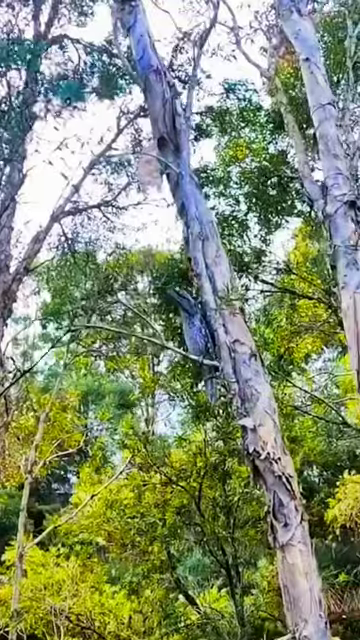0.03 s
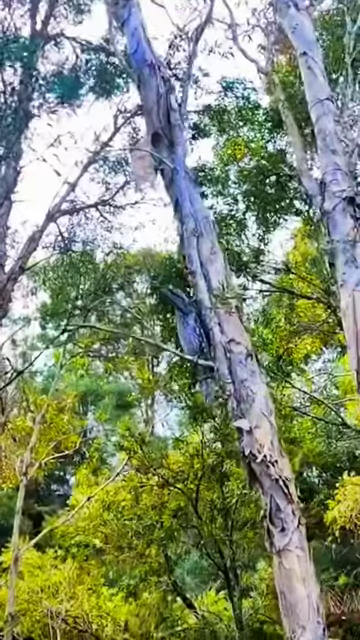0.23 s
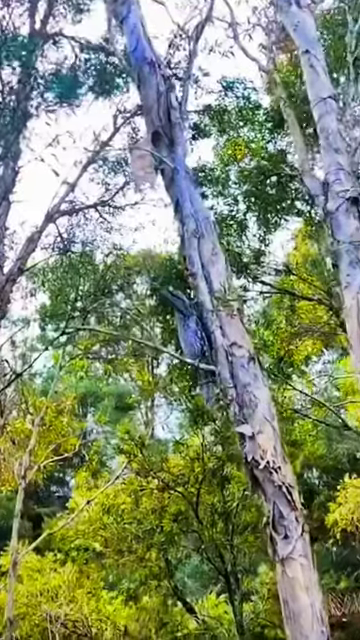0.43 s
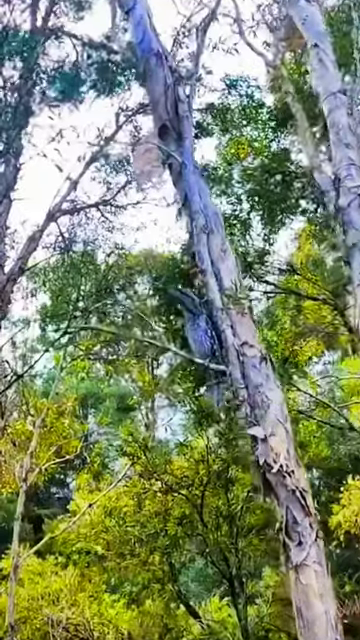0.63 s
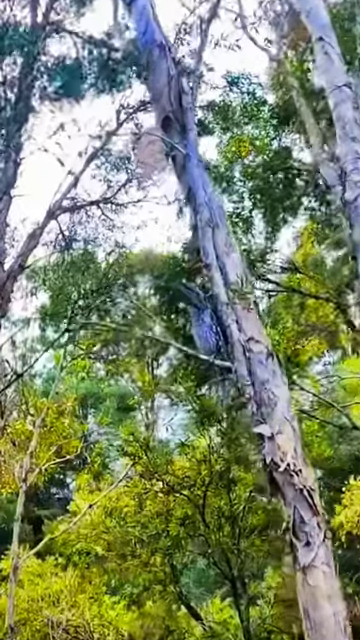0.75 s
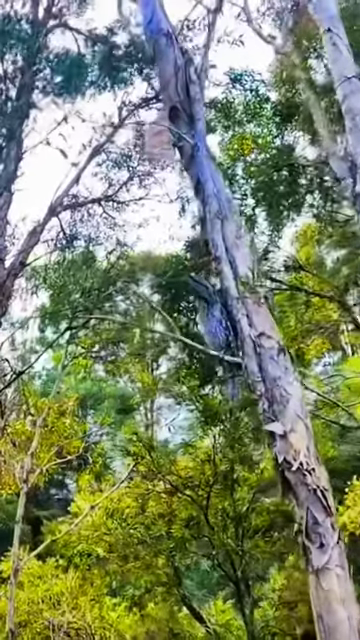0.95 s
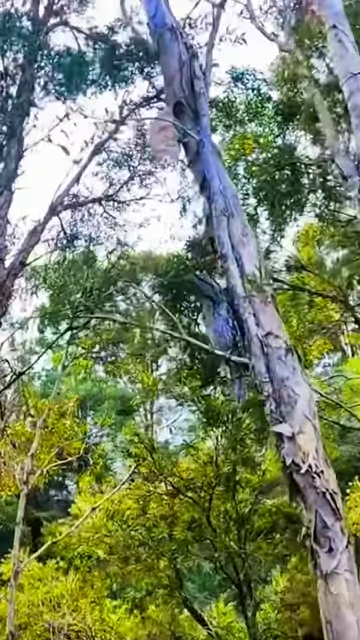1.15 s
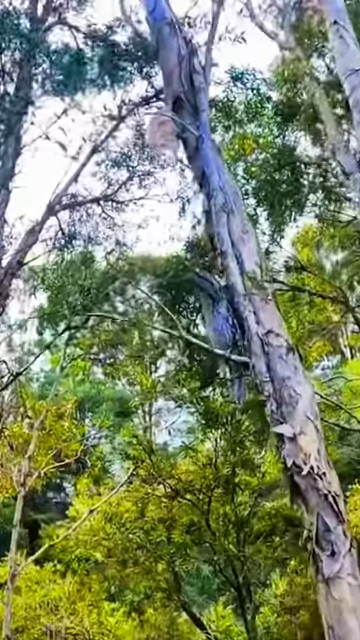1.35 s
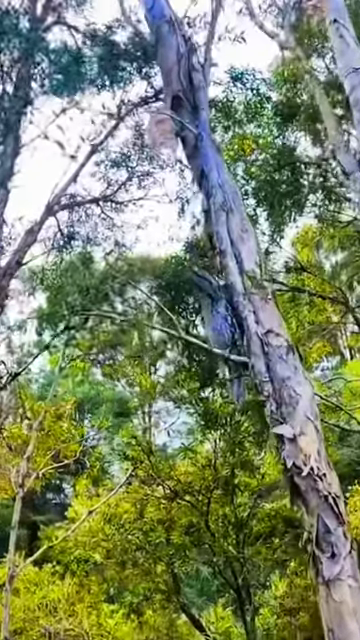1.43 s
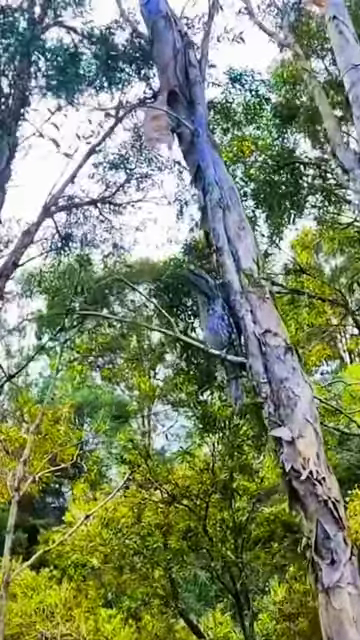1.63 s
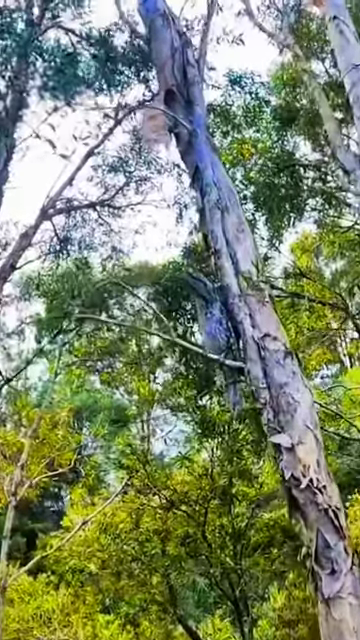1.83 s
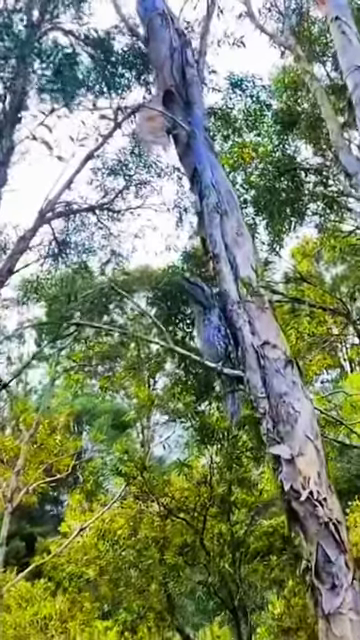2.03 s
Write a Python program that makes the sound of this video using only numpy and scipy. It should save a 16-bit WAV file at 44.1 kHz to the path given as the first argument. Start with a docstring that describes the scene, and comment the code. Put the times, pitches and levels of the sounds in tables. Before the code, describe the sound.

Fingers bump a phone microphone as wind swells through crackling woodland leaves. A nearby bird gives a trilled whistle and, as the gust dies, a short stuttering note, with distant whistles and thin chirps echoing lightly among the trees.

```python
"""Fingers bump a phone in the woods as wind starts to buffet its microphone.
The gust swells through dry leaves, which rustle and crackle as they touch, then dies away.
A bird gives a long trilled whistle, then a stutter that opens into a clear note.
Other birds add soft whistles and thin high chirps, and the trees echo them all."""
import sys
import numpy as np
from scipy import signal
from scipy.fft import rfft, irfft
from scipy.io import wavfile
from scipy.ndimage import uniform_filter1d

SR = 44100
rng = np.random.default_rng(int(sys.argv[2]) if len(sys.argv) > 2 else 0)


def bounce(signal):
    """Save signal as a 16-bit WAV file at the path given by the first command-line argument."""
    frames = np.transpose(np.atleast_2d(signal))
    limited = np.clip(frames, -1, 1)
    pcm = np.round(limited * 32767).astype(np.int16)
    wavfile.write(sys.argv[1], SR, pcm)


N = 92610
T = np.arange(N) / SR
FREQS_HZ = np.arange(N // 2 + 1) * SR / N
START_S = .172  # silence until here


def undb(db):
    """Turn decibels into a number to multiply by."""
    return 10 ** (np.asarray(db) / 20)


def unit(x):
    """Scale a signal to an average strength (rms) of 1."""
    return x / np.sqrt(np.mean(x ** 2) + 1e-18)


def curves(rows):
    """Join a table's points into one line per column; the first column is time."""
    rows = np.array(rows, float)
    return [np.interp(T, rows[:, 0], column) for column in rows.T[1:]]


def wobble(rate_hz):
    """A smooth random wander of size about 1; a higher rate wanders faster."""
    span = max(int(SR / rate_hz), 2)
    smoothed = uniform_filter1d(rng.standard_normal(N), span, mode="wrap")
    return unit(uniform_filter1d(smoothed, span, mode="wrap"))


def colour(x, points):
    """Set the balance of low and high from (Hz, dB) points, fading steeply outside them."""
    hz, db = np.array(points, float).T
    f = np.maximum(FREQS_HZ, 1)
    gain = undb(np.interp(np.log(f), np.log(hz), db))
    edges = np.minimum(f / hz[0], 1) ** 4 * np.minimum(hz[-1] / f, 1) ** 8
    return unit(irfft(rfft(x) * gain * edges, N))


def arch(start, length):
    """Progress from 0 to 1 through a sound, and its rounded rise and fall."""
    progress = np.clip((T - start) / length, 0, 1)
    return progress, np.sqrt(4 * progress * (1 - progress))


def tone(hz):
    """A pure tone that follows a changing pitch."""
    return np.sqrt(2) * np.sin(2 * np.pi * np.cumsum(hz) / SR)


def bursts(rows):
    """Short puffs of noise, each around its own pitch."""
    out = np.zeros(N)
    for start, length, hz, width, db in rows:
        band = np.exp(-2 * ((FREQS_HZ - hz) / width) ** 2)
        noise = irfft(rfft(rng.standard_normal(N)) * band, N)
        _, swell = arch(start, length)
        out += unit(noise * swell ** 2) * np.sqrt(length * SR / N) * undb(db)
    return out


def tree_echo(x, echo_db, fade_s=.74, build_s=.01):
    """Trunks and treetops scatter a sound back as a fading wash of echoes."""
    tail = rng.standard_normal(N) * undb(-60 * T / fade_s)
    tail *= 1 - np.exp(-(T / build_s) ** 2)
    tail /= np.sqrt(np.sum(tail ** 2))
    return x + undb(echo_db) * signal.fftconvolve(x, tail)[:N]


def wind():
    """Moving air buffets the microphone, with a deep rumble underneath."""
    # how each rises and falls: time_s, relative_db
    buffet_levels = [(0.18, -42.5), (0.212, -35.5), (0.238, -33.5), (0.426, -42.5), (0.468, -35),
                     (0.73, -42), (0.762, -30.5), (0.868, -48), (0.896, -44), (1.014, -41), (1.43, -46),
                     (2.1, -45)]
    rumble_levels = [(.18, -50), (.27, -39), (.34, -41), (.41, -38), (.5, -37.5), (.575, -32), (.64, -41.5),
                     (.9, -39.5), (1.03, -44.5), (1.09, -33.5), (1.17, -40.5), (2.1, -44)]
    # the tone of each: pitch_hz, relative_db
    buffet_colour = [(65, 2), (90, -3.5), (130, -2.5), (214, -9.5), (400, -18.5)]
    rumble_colour = [(18, 5.5), (32, -1), (49, 3.5), (57, -11)]
    buffet = colour(rng.standard_normal(N), buffet_colour) * undb(curves(buffet_levels)[0] - 2)
    rumble = colour(rng.standard_normal(N), rumble_colour) * undb(curves(rumble_levels)[0])
    return buffet + rumble


def finger_taps():
    """Fingers scuff and tap the phone's case."""
    # touches: start_s, length_s, centre_hz, width_hz, level_db
    taps = [(.171, 0.015, 600, 700, -45.5), (.203, 0.03, 302, 900, -41.5),
            (.254, 0.0049, 1200, 2200, -33.5), (.256, 0.0089, 680, 350, -33)]
    return bursts(taps)


def case_bumps():
    """The case gives a dull boom when it is bumped."""
    # booms: start_s, length_s, pitch_hz, level_db
    bumps = [(0.201, 0.079, 95, -30.5), (0.25, 0.013, 450, -28.5), (0.28, 0.066, 87.7, -37),
             (0.86, 0.096, 84, -34)]
    out = np.zeros(N)
    for start, length, hz, db in bumps:
        _, swell = arch(start, length)
        out += tone(hz * (1 + .044 * wobble(60))) * swell ** 2 * undb(db)
    return out


def leaf_rustle(touches_per_s=2200, spread_db=2.5, click_share=.28):
    """Countless tiny leaf touches merge into a rustle that rises and falls with the gust."""
    # the rustle's three layers over time: time_s, body_db, hiss_db, sizzle_db
    levels = [(.28,-52,-46,-44), (.35,-40.5,-37,-30.5), (.45,-40,-32.5,-28), (.58,-32,-27,-25),
              (.665,-38,-30.5,-26), (.715,-33.5,-31,-26), (.82,-37,-29,-27.5), (.86,-32.5,-26,-23.5),
              (.92,-38,-32,-30), (1.03,-41.5,-30,-30), (1.09,-38.5,-31,-30.5), (1.21,-45,-35.5,-34),
              (1.26,-42.5,-41.5,-36.5), (1.305,-44,-38.5,-34), (1.41,-46,-39,-36.5),
              (1.53,-47.5,-43.5,-37.5), (1.615,-43.5,-38.5,-35.5), (1.72,-48,-42,-41), (1.9,-50,-44.5,-41),
              (2.1,-51,-51,-48.5)]
    # the tone of the low, middle and high layer: pitch_hz, relative_db
    body = [(150,-13.5), (215,-13.5), (500,-8.5), (1050,-8.5), (1900,-6), (2200,-7.5)]
    hiss = [(1300, -22.5), (1900, -5), (2600, 1), (3500, 1.5), (5000, -1), (6200, -5), (7200, -42.5)]
    sizzle = [(3820, -30), (6500, -5.5), (6790, -5), (8950, -2), (11000, -2), (14300, -10.5),
              (15700, -14.5)]
    offsets_db = (4, 2.5, -1)
    touches = (rng.random(N) < touches_per_s / SR) * rng.choice([-1, 1], N)
    clicks = unit(touches * undb(spread_db * np.minimum(rng.exponential(size=N), 5)))
    flutter_db = 1.14 * wobble(51)
    fade_in_db = np.interp(T, [START_S, levels[0][0]], [-9.5, 0])
    out = np.zeros(N)
    for db, layer, offset_db in zip(curves(levels), (body, hiss, sizzle), offsets_db):
        rustle = np.sqrt(click_share) * clicks + np.sqrt(1 - click_share) * rng.standard_normal(N)
        gain = undb(db + offset_db + fade_in_db + flutter_db + .77 * wobble(43))
        out += colour(rustle, layer) * gain
    return out


def leaf_crackles():
    """Single leaves and twigs scrape and snap above the rustle."""
    # crackles: start_s, length_s, centre_hz, width_hz, level_db
    crackles = [(.548, .005, 11000, 5000, -28), (.608, 0.023, 10200, 3000, -25),
                (.686, 0.014, 3240, 1500, -28.5), (.778, .006, 9000, 7000, -30),
                (.846, 0.0018, 4000, 6960, -22), (.8745, 0.00078, 5500, 6000, -17),
                (1.048, 0.011, 10000, 5000, -23.5), (1.598, 0.029, 794, 900, -40),
                (1.862, 0.0059, 9500, 2980, -37)]
    return bursts(crackles)


def whistling_birds():
    """Birds give soft whistles that bend in pitch, and one short, sharp chip."""
    # calls: start_s, length_s, first_hz, middle_hz, last_hz, level_db
    whistles = [(0.258, .05, 2360, 2620, 2930, -46), (0.587, 0.069, 1930, 1940, 1964, -29),
                (0.683, 0.012, 2500, 2475, 2380, -19), (1.36, 0.053, 1552, 1655, 1650, -42.5),
                (1.454, 0.098, 1824, 1933, 1780, -38), (1.559, .05, 1840, 1930, 1880, -50),
                (1.605, 0.068, 2700, 2673, 2620, -43.5), (1.804, 0.051, 2090, 2200, 2126, -34),
                (1.964, 0.022, 2220, 2250, 2200, -42.5)]
    out = np.zeros(N)
    for start, length, first, middle, last, db in whistles:
        progress, swell = arch(start, length)
        bend = np.polyfit([0, .5, 1], [first, middle, last], 2)  # a curve through the three pitches
        hz = np.polyval(bend, progress) + 24 * wobble(200)
        out += tone(hz) * swell * undb(db)
    return tree_echo(out, echo_db=-7)


def chirping_birds():
    """Thin high chirps, mostly falling; a fast shake in pitch makes them raspy."""
    # calls: start_s, length_s, first_hz, last_hz, level_db, rasp_hz
    chirps = [(1.121, 0.065, 5350, 5150, -42, 230), (1.184, 0.04, 5130, 5170, -35, 50),
              (1.348, .06, 5170, 5100, -36.5, 129), (1.4, 0.041, 4980, 5020, -35, 45),
              (1.611, 0.1, 5350, 4860, -36, 280.8), (1.665, 0.07, 4950, 4480, -39, 230),
              (1.916, 0.058, 5600, 5300, -42.5, 500), (1.96, 0.058, 4450, 4470, -39, 69)]
    out = np.zeros(N)
    for start, length, first, last, db, rasp in chirps:
        progress, swell = arch(start, length)
        hz = first + (last - first) * progress + rasp * wobble(700)
        out += tone(hz) * swell * undb(db + 2 * wobble(150))
    return tree_echo(out, echo_db=-10)


def warble(rows, flicks_per_s, sweep_hz, drop_hz, dip):
    """A whistle broken into quick upward flicks, quieter at each drop in pitch."""
    hz, db = curves(rows)[:2]
    start, end = rows[0][0], rows[-1][0]
    rate = flicks_per_s * (1 + .016 * wobble(39.3)) * (T > start)
    flick = np.cumsum(rate) / SR % 1  # runs from 0 to 1 in each flick
    gap = np.cos(np.pi * flick) ** 4  # peaks between flicks
    singing = uniform_filter1d(1. * ((T > start) & (T < end)), size=200)
    pitch = hz + sweep_hz * (flick - .5) - drop_hz * gap + 14 * wobble(227)
    return tone(pitch) * (1 - dip * gap) * singing * undb(db)


def near_bird():
    """A close bird whistles a long trill, then a stutter that opens into a clear note."""
    # the trill: time_s, pitch_hz, level_db
    trill_path = [(.74, 2310, -39), (.775, 2480, -32), (.82, 2558, -21.5), (.87, 2580, -24),
                  (.925, 2600, -21), (.96, 2535, -23), (.99, 2629, -22.5), (1.03, 2565, -22.5),
                  (1.095, 2638, -21), (1.112, 2616, -25), (1.122, 2400, -34)]
    # the stutter and clear note: time_s, pitch_hz, level_db, stutter_depth (0 to 1)
    song_path = [(1.672, 2380, -48, 0.96), (1.695, 2400, -32, 1), (1.718, 2390, -32.5, 1),
                 (1.732, 2426, -29, 1), (1.748, 2633, -26, 0.02), (1.77, 2580, -27.5, 0.05),
                 (1.785, 2559, -21.5, 0), (1.797, 2604, -30.5, 0), (1.808, 2470, -32, 0.1)]
    depth = curves(song_path)[2]
    trill = warble(trill_path, flicks_per_s=89.8, sweep_hz=180, drop_hz=130, dip=.85)
    song = warble(song_path, flicks_per_s=59, sweep_hz=557 * depth, drop_hz=0, dip=.48 * depth)
    return tree_echo(trill, echo_db=-11.5) + tree_echo(song, echo_db=-11)


def scene():
    """Everything reaches one microphone, so left and right are the same."""
    birds = near_bird() + whistling_birds() + chirping_birds()
    leaves = leaf_rustle() + leaf_crackles()
    mix = birds + leaves + finger_taps() + wind() + case_bumps()
    return np.tile(mix, (2, 1))


def record(dry, top_hz=15750):
    """The phone lets sound in after a moment of silence and cuts the highest treble."""
    opened = np.clip((T - START_S) / .002, 0, 1)
    treble_cut = signal.ellip(10, .2, 80, top_hz, fs=SR, output="sos")
    return signal.sosfilt(treble_cut, dry * opened)


dry = scene()
out = record(dry)
bounce(out)
```